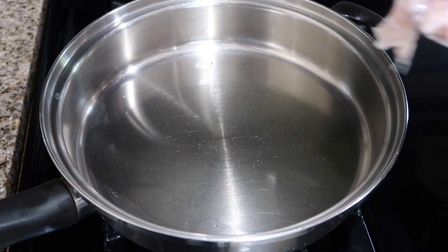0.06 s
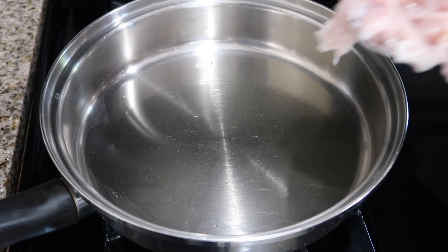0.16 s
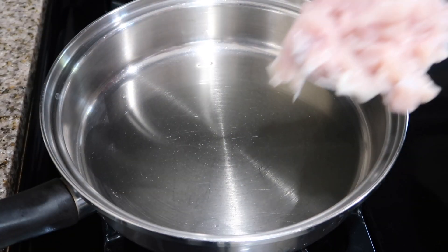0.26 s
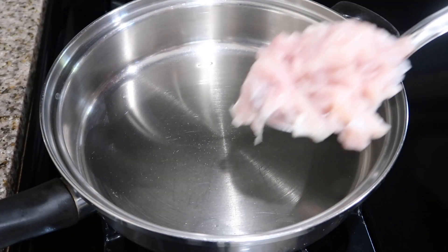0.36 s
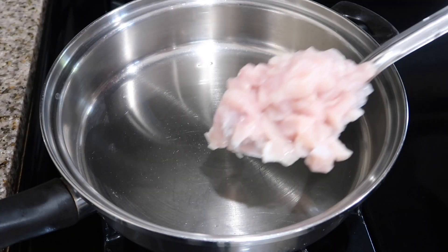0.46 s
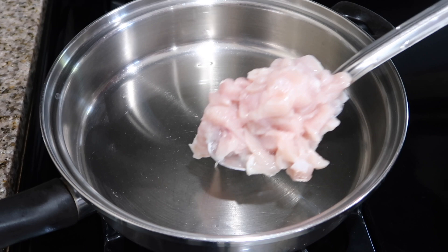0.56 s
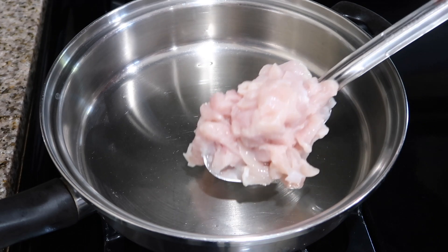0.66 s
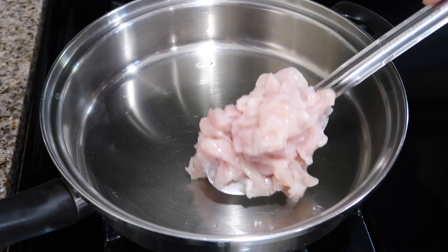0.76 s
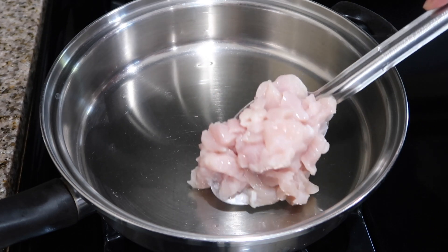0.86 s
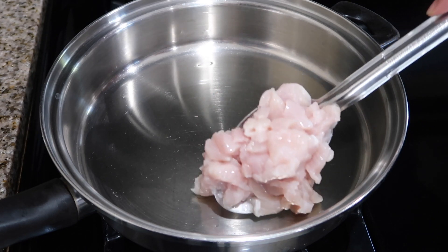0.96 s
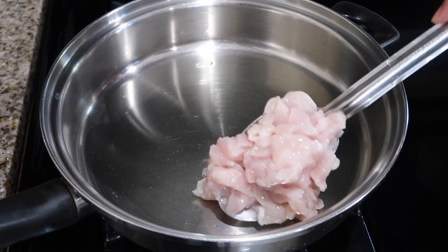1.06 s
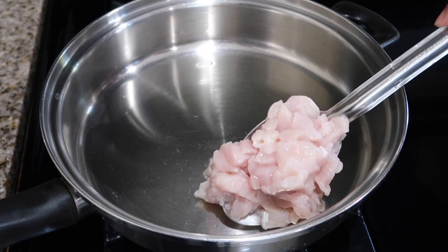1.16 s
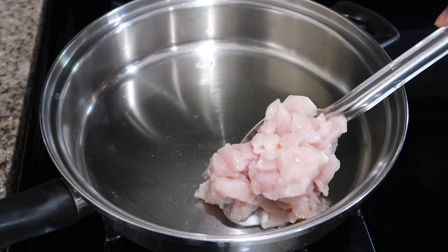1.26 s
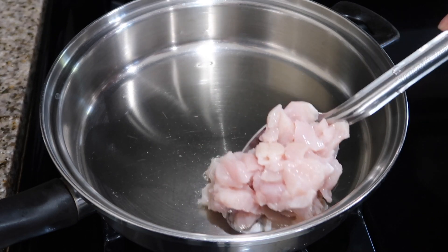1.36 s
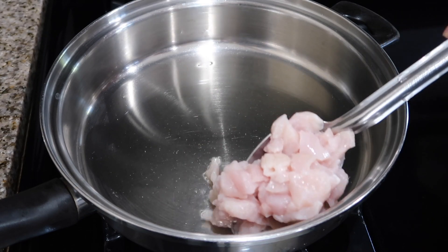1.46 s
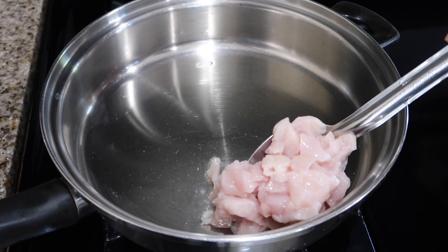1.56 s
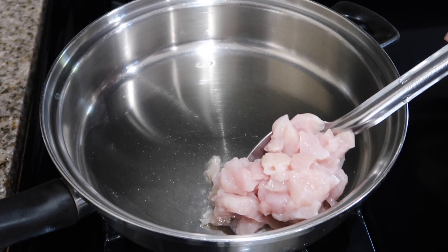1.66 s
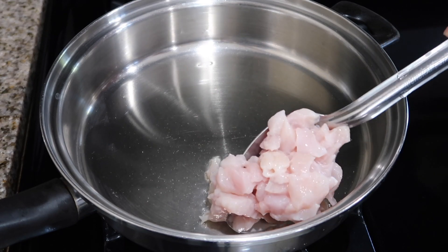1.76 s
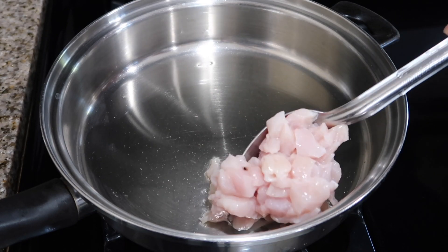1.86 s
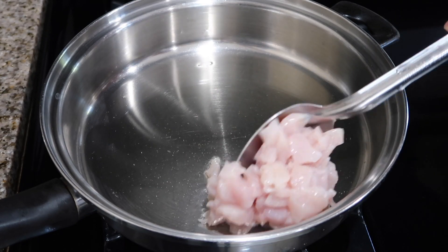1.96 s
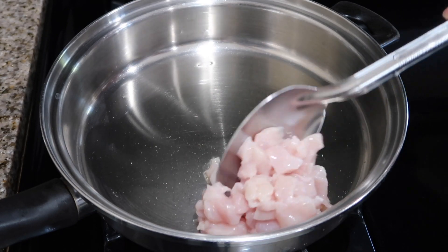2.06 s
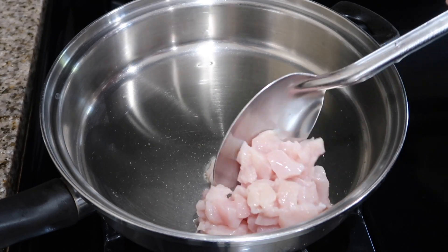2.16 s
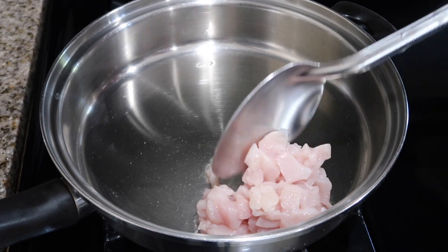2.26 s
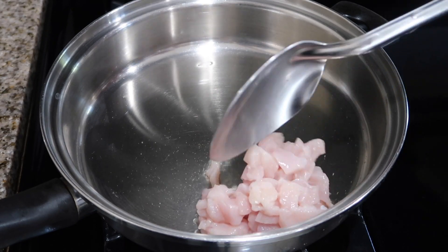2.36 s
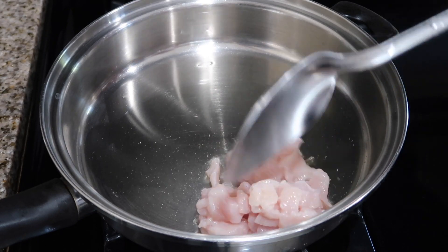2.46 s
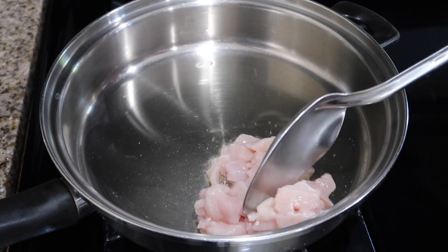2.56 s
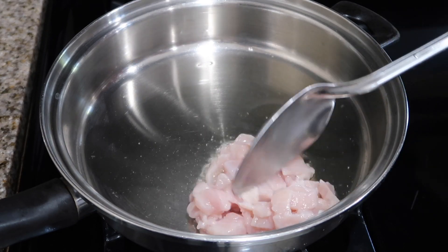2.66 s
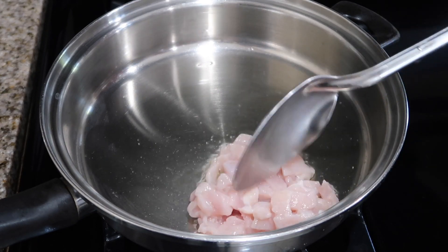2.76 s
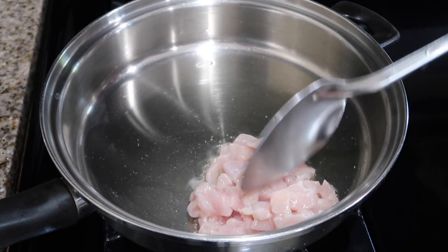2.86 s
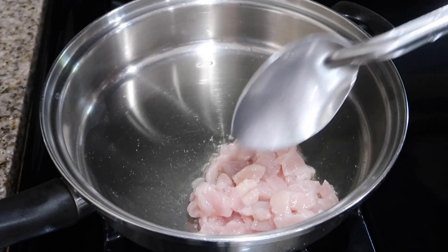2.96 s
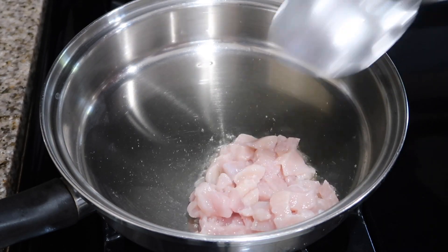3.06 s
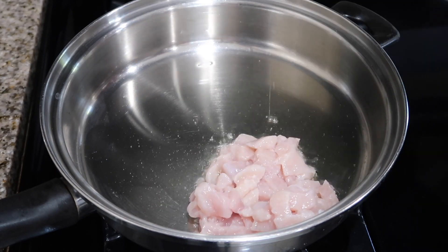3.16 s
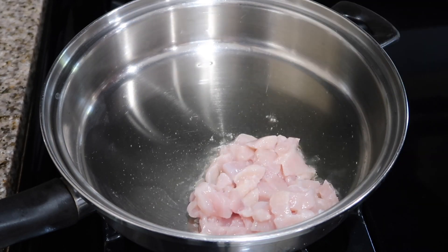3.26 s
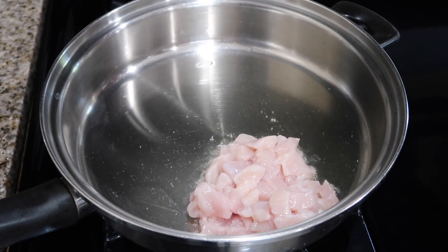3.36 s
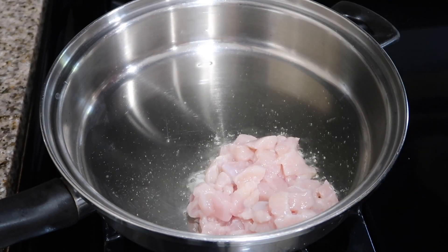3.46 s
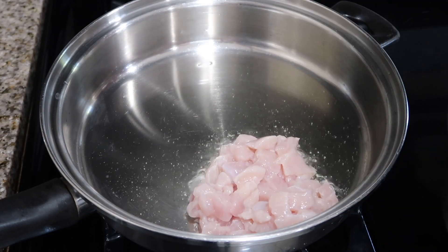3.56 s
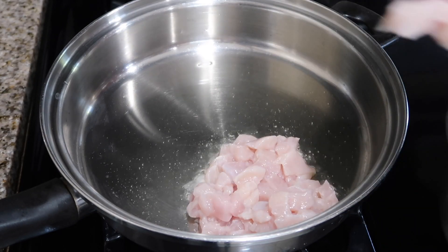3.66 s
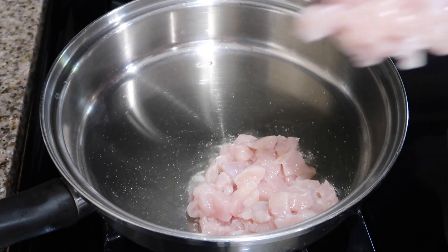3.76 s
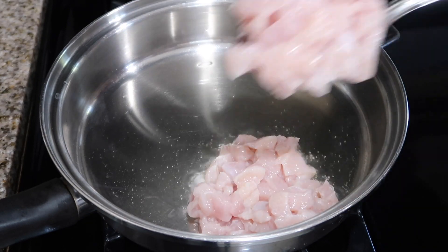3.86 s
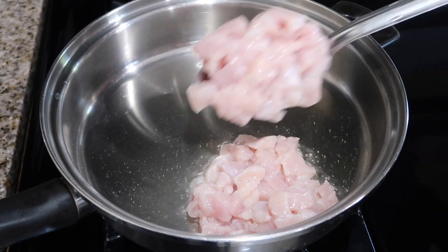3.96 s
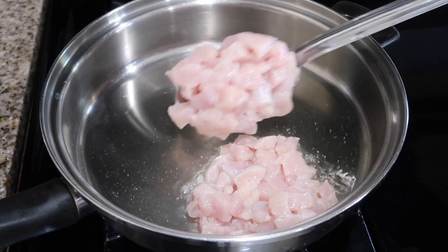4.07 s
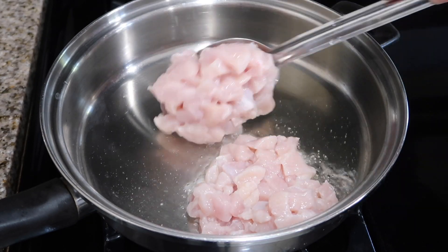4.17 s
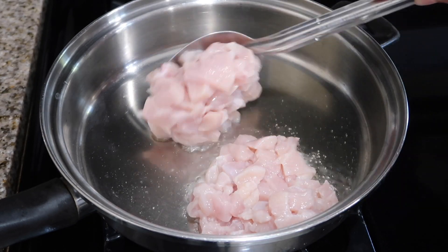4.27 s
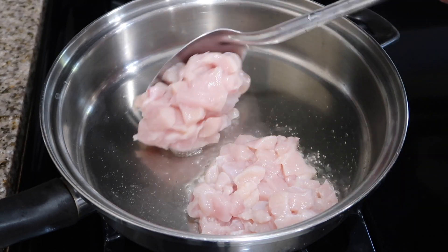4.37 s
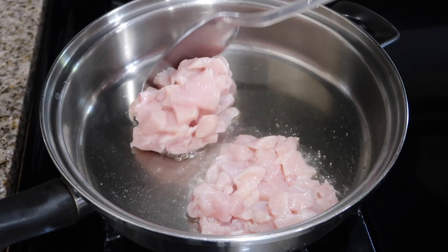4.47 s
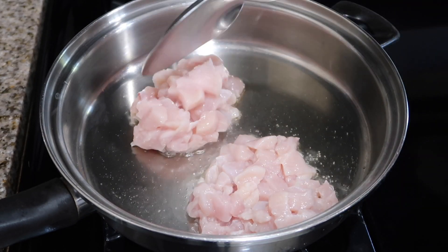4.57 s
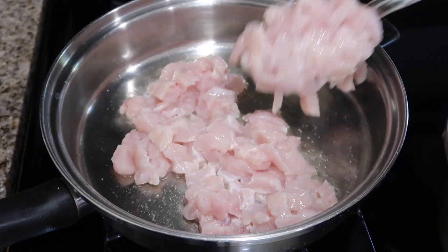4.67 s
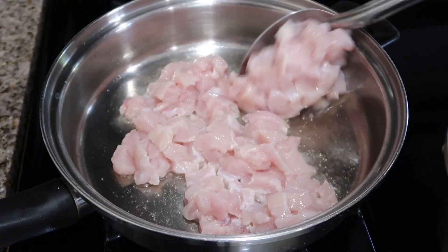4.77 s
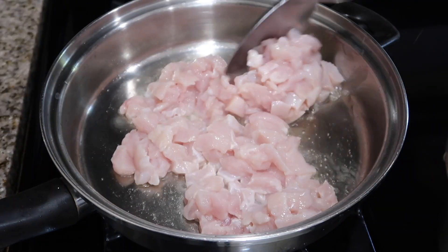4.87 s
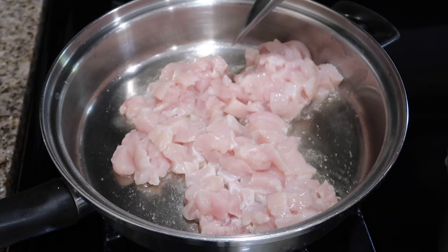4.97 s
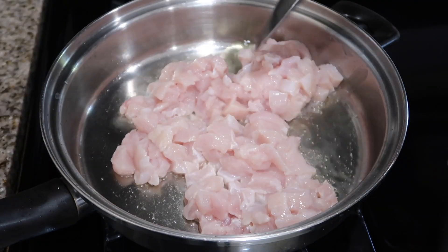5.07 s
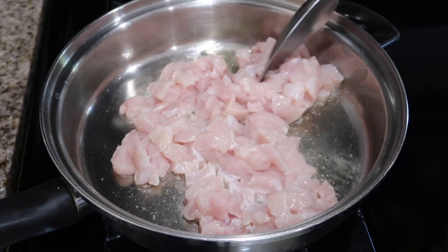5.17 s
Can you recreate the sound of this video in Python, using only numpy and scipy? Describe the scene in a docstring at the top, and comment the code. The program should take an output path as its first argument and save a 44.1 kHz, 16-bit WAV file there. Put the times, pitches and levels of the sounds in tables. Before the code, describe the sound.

After a quiet kitchen hum, wet diced chicken touches hot oil in a steel pan and sizzles up to a lively, crackling fry with spoon knocks.

```python
"""A low kitchen hum is there from the start. Then diced raw chicken is spooned into hot oil in a steel pan.
At the first touch the spoon clinks, the steel rings where spoon and meat rub it, and water flashes to steam:
swarms of short, fading tones make big bubbles sputter under the meat and small ones crackle and fizz.
Spoon knocks ring the pan, steam squirts out as filtered noise, drops spit and large bubbles snap.
Later a fuzzy note of steam sings under the spoon, and a low rumble swells with the second spoonful."""
import sys
import numpy as np
from scipy import signal
from scipy.fft import rfft, irfft, next_fast_len
from scipy.io import wavfile
from scipy.ndimage import map_coordinates

SR = 44100
rng = np.random.default_rng(int(sys.argv[2]) if len(sys.argv) > 2 else 0)


def materialize(psi):
    """Save the field psi as 16-bit PCM at rate SR to the path in sys.argv[1].

    A 1-D psi becomes a single channel; in a 2-D psi each row is a channel.
    """
    bounded = np.clip(np.atleast_2d(psi).T, -1, 1)
    quanta = np.round(bounded * 32767).astype(np.int16)
    wavfile.write(sys.argv[1], SR, quanta)


N = 229620

# Tone colour of the kitchen background: (frequency [Hz], relative level [dB])
KITCHEN_COLOUR = [(15, -25), (28, -11), (45, -8), (100, -5.5), (150, -10.5), (300, -10), (400, -17),
                  (720, -17), (1000, -25), (2000, -33), (2800, -32.5), (6000, -42.5), (15000, -55.5)]
KITCHEN_DB = -44.5
# Steady tones of an appliance: (frequency [Hz], rms level [dB])
APPLIANCE_HUM = [(59.4, -50), (119, -53.5), (237, -59.5), (473, -57), (2664, -70)]
# How alike left and right are in the room background: (frequency [Hz], likeness [-1 to 1])
ROOM_ALIKE = [(60, 1), (200, 0.96), (500, 0.74), (1000, 0.76), (1700, 0.13), (4000, 0.16), (12000, -0.24)]
# How alike left and right are close to the pan: (frequency [Hz], likeness [-1 to 1])
CLOSE_ALIKE = [(60, 1.0), (99, 1.0), (160, 1), (270, 0.99), (450, 1), (740, 1), (1220, 1), (2010, 1),
               (3330, 0.95), (5500, 0.52), (9080, 0.1), (15000, -0.41)]

# Ringing modes of the pan with the spoon in it:
# (frequency [Hz], width [Hz], level over a bubble's direct sound [dB], weight when rubbed or knocked [dB])
PAN_MODES = [(338, 14, 9.5, -26), (473, 16, 4, -24), (638, 40, 0, -9), (757, 24, 3.5, -3), (852, 28, 6, -1),
             (1195, 45, 1, -9), (1365, 60, 1, -12), (1470, 50, -4, -12), (1828, 40, -6, 0),
             (2140, 60, 0, -17), (3030, 60, -6, -3), (3320, 170, -3, -12), (3610, 55, -9, -10),
             (3890, 100, -5, -8), (4280, 55, -8, -6), (4520, 70, -7, -8), (5030, 110, -10, -8),
             (5600, 120, -3, -7), (6450, 200, -14, -13), (7200, 180, -14, -11)]
DETUNE = 0.0048  # typical random retuning of a mode by the shifting meat, as a share of its pitch

# Spoon or meat sliding on the steel; soft meat rings it low, the spoon's edge high:
# (time [s], length before the fall [s], level [dB], pitch [Hz], spread [octaves])
RUBS = [(0.802, 0.33, -45.5, 834, 0.13), (0.79, 0.052, -41.5, 796, 0.25), (0.793, 0.1, -42, 1900, 0.25),
        (0.93, 0.04, -36, 1830, 0.18), (0.92, 0.53, -36, 3700, 0.83), (1.005, 0.25, -50, 1830, 0.2),
        (1.25, 0.75, -35, 2080, 0.5), (1.565, 0.16, -33.5, 5540, 0.12), (1.583, 0.23, -34, 3800, 0.25),
        (2.064, 0.069, -22.5, 1830, 0.24), (2.15, 0.41, -32, 1830, 0.2), (2.535, 0.081, -26.5, 1840, 0.2),
        (2.518, 0.6, -33, 760, 0.4), (2.677, 0.63, -29.5, 1860, 0.48), (3.406, 0.054, -27, 1700, 0.81),
        (4.29, 0.32, -29.5, 2800, 0.83), (4.347, 0.26, -29, 905, 0.69), (4.485, 0.12, -35, 1850, 0.28),
        (4.853, 0.028, -24, 5450, 0.44), (4.92, 0.05, -30, 3400, 0.25), (5.035, 0.064, -33, 3400, 0.27)]
RUB_ATTACK_S, RUB_FALL_DB_PER_S = 0.012, 510
SLIPS_PER_S = 1800  # a slide is a train of tiny slips
BUNCH_DB, BUNCH_RATE = 2.5, 45  # depth of the slips' bunching, and random points a second
# The meat shuddering on the pan: level at full boil, dB per dB of boil, pitch, spread
SHUDDER_DB, SHUDDER_GROWS, SHUDDER_HZ, SHUDDER_OCTAVES = -41, 0.97, 1090, 0.68

TOUCH_S = 0.7995  # spoon and meat meet the oil
LIFTED_DB, SETTLED_S = -3.5, 1.1  # the first touch is thin, until the meat has settled on the steel

# How hard the oil boils: (time [s], boil [dB], level of the finest spray [dB])
BOIL = [(0.83, -32, -32), (0.88, -35, -43), (1.0, -32, -38), (1.21, -32.5, -34), (1.38, -28.5, -32.5),
        (1.6, -26, -32), (1.8, -24.5, -30.5), (2.05, -23, -28.5), (2.22, -20.5, -29.5), (2.34, -20, -27),
        (2.42, -22, -30), (2.62, -22, -30.5), (3.15, -19.5, -27.5), (3.3, -21, -28.0), (3.7, -21.5, -28),
        (4.2, -22, -29), (4.62, -22, -28), (4.658, -25, -29.5), (4.95, -22.5, -29.5)]
FULL_BOIL_DB = -21  # the boil once the heap lies in the oil
# Tone colour of the frying: (frequency [Hz], relative level [dB])
FRYING_COLOUR = [(150, -8), (250, -20.5), (330, -11.5), (392, -22), (614, -6.5), (837, -13.5), (913, -10.5),
                 (1200, -2), (1670, -5.5), (1850, -2.5), (2020, -3.5), (3110, 2.5), (12200, -8),
                 (14200, -12), (15500, -34)]
# Wet meat slumps onto fresh oil and the boiling surges:
# (time [s], hold [s], fall [dB per s], big bubbles [dB], small bubbles [dB])
SURGES = [(1.245, 0.11, 29, -42, -42), (1.864, 0.22, 56, -51.5, -31), (2.054, 0.079, 200, -46, -28.5),
          (2.227, 0.11, 145, -36, -25), (2.517, 0.14, 4, -32.5, -28), (4.282, 0.37, 689, -36, -39),
          (4.827, 0.05, 142, -31.5, -38), (5.018, 0.2, 10, -32.5, -37.5)]
SURGE_ATTACK_S = 0.024
SPRAY_RISE_S = 0.042  # the finest spray builds up after the touch
FLURRY_DB, FLURRY_RATE = 0.83, 32  # bubbles come in flurries: basic depth, and random points a second
# Each size of bubble: level at full boil, then dB per dB of boil
SPUTTER_DB, CRACKLE_DB, FIZZ_DB = -34, -26, -22.5
SPUTTER_GROWS, CRACKLE_GROWS, FIZZ_GROWS = 0.99, 1.02, 1.135
STRAY_DB, STRAY_GROWS = -40, 0.76  # sparse sharp pops of oil
# Juice runs off the spoon and spatters in bright clumps: (time [s], length before the fall [s], level [dB])
SPATTER_CLUMPS = [(1.513, 0.052, -31), (1.563, 0.064, -28), (1.67, 0.046, -30), (3.386, 0.12, -28.5)]
SPATTER_DB = -34.5  # between the clumps, at full boil
SPATTER_ATTACK_S, SPATTER_FALL_DB_PER_S = 0.01, 600

# The spoon knocks against the steel: (time [s], level [dB], pitch [Hz])
KNOCKS = [(0.947, -23, 2900), (1.15, -23, 3080), (2.069, -13, 1850), (2.073, -9, 3100), (2.102, -17, 1840),
          (2.118, -12, 1850), (2.544, -10.5, 1850), (2.602, -14, 1850), (3.237, -14, 1880),
          (4.498, -18, 1900), (4.859, -12.5, 5600), (4.938, -16, 3280)]
KNOCK_OCTAVES = 0.36  # how far around its own pitch a knock rings the steel
# Steam squirting from under the meat:
# (time of the middle [s], level [dB], pitch [Hz], basic width [Hz], spread in time [s])
JETS = [(1.04, -29, 5130, 250, 0.0062), (1.793, -28.5, 7540, 1200, 0.007), (2.355, -24, 3270, 900, 0.016),
        (3.202, -24, 3620, 1100, 0.013), (4.865, -20, 4370, 1500, 0.015)]
# Single drops that burst: (time [s], level before the trim [dB], pitch [Hz])
SPITS = [(1.237, -14, 1900), (1.277, -16, 1700), (1.29, -14.5, 1450), (1.342, -17, 1810),
         (1.364, -12.5, 3100), (1.39, -17.5, 1300), (1.425, -17.5, 4970), (1.439, -13, 2000),
         (1.484, -19, 1400), (1.586, -15, 1010), (1.716, -13, 2200), (2.368, -12, 2600), (2.551, -11, 1850),
         (3.236, -15, 1830), (4.504, -12, 3300), (4.981, -14, 1180)]
SPIT_TRIM_DB = -7.5
SPIT_CRACK_T60_S, SPIT_SPRAY_T60_S = 0.0064, 0.058  # time to fade by 60 dB
# Large single bubbles that snap: (time [s], peak level [dB], pitch [Hz])
POPS = [(1.2928, -14, 1400), (1.3448, -15, 1800), (1.3647, -14, 2100), (1.4417, -9, 4500),
        (2.1344, -2.5, 1590), (2.3708, -7, 2650), (2.5534, -9, 1990), (3.0415, -5, 4100),
        (3.2378, -1, 2200), (3.443, -3, 1700), (3.5445, -8, 2000), (4.0293, -7, 1500), (4.509, -7, 3600),
        (4.864, -8, 4000)]
POP_CYCLES = 4.6  # cycles to fade by 60 dB
# Steam in the hollow under the tilted spoon: (time [s], pitch [Hz], level [dB])
HOLLOW = [(1.84, 2250, -55), (1.89, 2246, -33), (2.05, 2290, -32.5), (2.189, 2323, -26), (2.3, 2374, -29),
          (2.37, 2450, -22), (2.41, 2385, -29), (2.48, 2320, -32), (2.54, 2290, -65)]
# Fading of the kitchen's echo: (frequency [Hz], time to fade by 60 dB [s])
WALL_FADE = [(300, 0.42), (3000, 0.12), (12000, 0.07)]
ECHO_DB = -10.0
TOP_HZ = 15138  # highest frequency kept


def amp(db):
    """Turn decibels into a gain."""
    return 10 ** (np.asarray(db) / 20)


def unit(x):
    """Scale so that the mean of the channels has rms 1."""
    return x / np.sqrt(np.mean(np.atleast_2d(x).mean(0) ** 2) + 1e-20)


def along(points, hz):
    """Read a (frequency, value) table on a logarithmic frequency axis."""
    f, v = np.transpose(points)
    return np.interp(np.log(hz + 1), np.log(f + 1), v)


def filtered(x, response):
    """Filter x by a gain or complex response given as a function of frequency."""
    m = next_fast_len(N + SR // 2, real=True)
    return irfft(rfft(x, m) * response(np.fft.rfftfreq(m, 1 / SR)), m)[..., :N]


def causal(gain):
    """Minimum-phase response with this gain: it starts promptly and never rings ahead of its cause."""
    cepstrum = irfft(np.log(np.maximum(gain, 1e-6)))
    half = len(cepstrum) // 2
    # fold the half before time zero onto the half after it
    cepstrum[1:half] *= 2
    cepstrum[half + 1:] = 0
    return np.exp(rfft(cepstrum))


def resonance(hz, centre, width):
    """One damped mode, with gain 1 at its centre."""
    return 1j * hz * width / (centre ** 2 - hz ** 2 + 1j * hz * width)


def band(hz, low, high, order=6):
    """Gain of a band-pass; a higher order makes it steeper."""
    low_cut = 1 + (low / (hz + 1)) ** (2 * order)
    high_cut = 1 + (hz / high) ** (2 * order)
    return 1 / np.sqrt(low_cut * high_cut)


def stereo(pair, alike=CLOSE_ALIKE):
    """Mix two signals to left and right, as alike at each frequency as the table says."""
    def mid_and_side_gain(hz):
        likeness = np.clip(along(alike, hz), -.9, .994)
        return np.array([np.ones_like(hz), np.tan(np.arccos(likeness) / 2)])
    mid, side = filtered(pair, mid_and_side_gain)
    return np.array([mid + side, mid - side])


def wobble(rate):
    """A smooth random curve through this many random points a second."""
    knots = rng.standard_normal(int(N * rate / SR) + 4)
    return map_coordinates(knots, [np.arange(N) * rate / SR])


def swell(start, attack, hold, fall):
    """Gain that rises, then falls in dB per second once the hold, counted from the start, is over."""
    age = np.arange(N) / SR - start
    return np.clip(age / attack, 0, 1) * amp(-fall * np.maximum(age - hold, 0))


def boil(grows):
    """The boil in dB against a full boil, for a layer that grows so many dB per dB."""
    s, db, _ = np.transpose(BOIL)
    return grows * (np.interp(np.arange(N) / SR, s, db) - FULL_BOIL_DB)


def lifted():
    """Loss in dB of crackle and shudder while the spoon still holds the meat off the steel."""
    return np.interp(np.arange(N) / SR, [TOUCH_S, SETTLED_S], [LIFTED_DB, 0])


def kitchen():
    """Diffuse room rumble from filtered noise, with an appliance's hum and faint whine as steady sines."""
    now = np.arange(N) / SR
    noise = filtered(rng.standard_normal((2, N)), lambda hz: amp(along(KITCHEN_COLOUR, hz)))
    air = unit(stereo(noise, ROOM_ALIKE))
    hum = sum(np.sqrt(2) * amp(db) * np.sin(2 * np.pi * (hz * now + rng.random()))
              for hz, db in APPLIANCE_HUM)
    return amp(KITCHEN_DB) * air + hum


def steel(pitch_hz, octaves):
    """The pan's ring after a contact: modes near the contact's pitch ring most, slightly retuned each time."""
    hz, width, _, db = np.transpose(PAN_MODES)[:, :, None]
    t = np.arange(SR // 8) / SR
    nearness = np.exp(-.5 * (np.log2(hz / pitch_hz) / octaves) ** 2)
    size = amp(db) * np.sqrt(width) * nearness
    tuned = hz * (1 + DETUNE * rng.standard_normal(hz.shape))
    modes = size * np.exp(-np.pi * width * t) * np.cos(2 * np.pi * tuned * t)
    signs = rng.choice([-1, 1], (2, len(PAN_MODES)))  # random polarity on each side
    return signs @ modes


def slide(level, pitch_hz, octaves):
    """Tiny slips, in uneven bunches, keep the steel ringing."""
    slips = rng.standard_normal((2, N)) * (rng.random(N) < SLIPS_PER_S / SR)
    slips = slips * amp(BUNCH_DB * np.tanh(wobble(BUNCH_RATE)))
    ring = signal.oaconvolve(level * slips, steel(pitch_hz, octaves), axes=1)[:, :N]
    return ring / ring[0].std() * np.sqrt(np.mean(level ** 2))


def rubbing():
    """Boiling meat shudders on the pan from the touch on; each slide of spoon or meat rings it too."""
    touching = np.arange(N) / SR > TOUCH_S
    shudder_level = amp(SHUDDER_DB + boil(SHUDDER_GROWS) + lifted()) * touching
    total = slide(shudder_level, SHUDDER_HZ, SHUDDER_OCTAVES)
    for s, length, db, hz, octaves in RUBS:
        level = amp(db) * swell(s, RUB_ATTACK_S, length, RUB_FALL_DB_PER_S)
        total = total + slide(level, hz, octaves)
    return stereo(total)


def clink(ring_db=-20, pitch_hz=2300, t60=0.019):
    """The loaded spoon touches down with one short, damped ring."""
    age = np.maximum(np.arange(N) / SR - TOUCH_S, 0)
    return amp(ring_db - 60 * age / t60) * np.sin(2 * np.pi * pitch_hz * age)


def pan(hz):
    """Gain of the pan: the direct sound plus its ringing modes."""
    return np.sqrt(1 + sum(np.abs(amp(db) * resonance(hz, f, w)) ** 2 for f, w, db, _ in PAN_MODES))


def bubbles(level, low_hz, high_hz, rate, cycles, scatter_db):
    """A swarm of bursting bubbles, each a few damped cycles; harder boiling makes more of them."""
    now = np.arange(N) / SR
    when, place, luck, side, strength, flip = rng.random((int(rate * N / SR), 6)).T
    start = (when * N).astype(int)
    hz = low_hz + place * (high_hz - low_hz)
    # share of the possible bubbles that burst
    busy = np.clip(level / np.median(level), .15, 1)
    # flurries stand out more when bubbles are few
    flare = amp(FLURRY_DB * wobble(FLURRY_RATE) / np.sqrt(busy))
    # many weak bubbles, a few strong ones, of random polarity
    size = flare[start] * amp(scatter_db * np.minimum(-np.log(1 - strength), 5))
    size = size * np.sign(flip - .5) * (luck < busy[start])
    age = np.arange(int(min(cycles * SR / low_hz, 400)))  # in samples
    phase = hz[:, None] * age / SR  # in cycles
    grains = (size * np.sqrt(hz))[:, None] * np.cos(2 * np.pi * phase) * amp(-60 * phase / cycles)
    # each bubble comes from its own direction
    direction = np.sqrt(3) * (2 * side[:, None] - 1)
    spots = (start[:, None] + age).ravel()
    pair = np.array([np.bincount(spots, g.ravel(), N)[:N] for g in (grains, grains * direction)])
    # even out the loudness, so that level alone sets it
    even = pair / np.sqrt(busy)
    colour = lambda f: causal(amp(along(FRYING_COLOUR, f)) * band(f, low_hz, high_hz) * pan(f))
    return unit(stereo(filtered(even, colour))) * level * (now > TOUCH_S)


def sizzle(seethe_db=0.26, seethe_rate=14):
    """Four sizes of bubble seethe together; surges add larger ones, spatter and stray pops stand out."""
    big, small = 0, 0
    for s, hold, fall, big_db, small_db in SURGES:
        surge = swell(s, SURGE_ATTACK_S, hold, fall)
        big = big + amp(big_db) * surge
        small = small + amp(small_db) * surge
    # slow pockets under the meat
    sputter_level = np.hypot(amp(SPUTTER_DB + boil(SPUTTER_GROWS)), big)
    sputter = bubbles(sputter_level, low_hz=286, high_hz=1155, rate=2000, cycles=1.9, scatter_db=3.0)
    # smaller bubbles at its edges
    crackle_level = np.hypot(amp(CRACKLE_DB + boil(CRACKLE_GROWS) + lifted()), small)
    crackle = bubbles(crackle_level, low_hz=1213, high_hz=2606, rate=3800, cycles=6.3, scatter_db=2.5)
    fizz_level = amp(FIZZ_DB + boil(FIZZ_GROWS))
    fizz = bubbles(fizz_level, low_hz=2400, high_hz=7280, rate=8500, cycles=6.6, scatter_db=1.0)
    # the finest spray
    s, _, spray_db = np.transpose(BOIL)
    mist_level = amp(np.interp(np.arange(N) / SR, s, spray_db)) * swell(TOUCH_S, SPRAY_RISE_S, 0, 0)
    mist = bubbles(mist_level, low_hz=6650, high_hz=17000, rate=14000, cycles=1.8, scatter_db=0.0)
    clumps = sum(amp(db) * swell(s, SPATTER_ATTACK_S, length, SPATTER_FALL_DB_PER_S)
                 for s, length, db in SPATTER_CLUMPS)
    spatter_level = np.hypot(amp(SPATTER_DB + boil(FIZZ_GROWS)), clumps)
    spatter = bubbles(spatter_level, low_hz=2800, high_hz=6600, rate=1800, cycles=7.3, scatter_db=1.5)
    stray_level = amp(STRAY_DB + boil(STRAY_GROWS))
    strays = bubbles(stray_level, low_hz=795, high_hz=8000, rate=45, cycles=1.9, scatter_db=2.5)
    seethe = amp(seethe_db * wobble(seethe_rate))
    return seethe * (sputter + crackle + fizz + mist) + spatter + strays


def knocks():
    """The spoon's edge catches on the steel: an abrupt ring that oil and meat soon damp."""
    out = np.zeros((2, N + SR))
    for s, db, hz in KNOCKS:
        ring = steel(hz, KNOCK_OCTAVES)
        out[:, round(s * SR):][:, :ring.shape[1]] += amp(db) * ring / np.abs(ring[0]).max()
    return stereo(out[:, :N])


def jets():
    """Trapped steam escapes through a narrow gap in a short, pitched hiss."""
    now, out = np.arange(N) / SR, np.zeros((2, N))
    for s, db, hz, width, spread in JETS:
        # two wide resonances in a row
        hiss = filtered(rng.standard_normal((2, N)), lambda f: resonance(f, hz, 2.5 * width) ** 2)
        out += amp(db) * unit(hiss) * np.exp(-.5 * ((now - s) / spread) ** 2)
    return stereo(out)


def spits():
    """A drop bursts with a crack and a brief spray of noise, both coloured by the pan's ringing."""
    out, t = np.zeros((2, N)), np.arange(SR // 5) / SR
    f = np.fft.rfftfreq(len(t), 1 / SR)
    shape = 0.25 * amp(-60 * t / SPIT_CRACK_T60_S) + amp(-60 * t / SPIT_SPRAY_T60_S)
    for s, db, hz in SPITS:
        colour = causal(np.abs(resonance(f, hz, 1.4 * hz)) ** 2 * pan(f))
        colour /= np.sqrt(np.mean(np.abs(colour) ** 2))
        noise = shape * rng.standard_normal((2, len(t)))
        burst = irfft(rfft(noise) * colour, len(t))[:, :N - round(s * SR)]
        out[:, round(s * SR):][:, :len(t)] += amp(db + SPIT_TRIM_DB) * burst
    return stereo(out)


def pops():
    """A large bubble snaps close to the microphone: a few sharply damped cycles."""
    out, t = np.zeros(N), np.arange(SR // 50) / SR
    for s, db, hz in POPS:
        snap = amp(db - 60 * hz * t / POP_CYCLES) * np.cos(2 * np.pi * hz * t)
        out[round(s * SR):][:len(t)] += snap
    return out


def hollow(width_hz=95):
    """Steam sings in a hollow: a fuzzy note climbs as the gap closes, then sinks and dies as it opens."""
    now = np.arange(N) / SR
    s, hz, db = np.transpose(HOLLOW)
    # slow noise on a sine and a cosine blurs the note
    flutter = filtered(rng.standard_normal((2, 2, N)), lambda f: 1 / (1 + (f / width_hz) ** 3))
    phase = 2 * np.pi * np.cumsum(np.interp(now, s, hz)) / SR
    note = flutter[0] * np.cos(phase) + flutter[1] * np.sin(phase)
    singing = (now > s[0]) * (now < s[-1])
    return amp(np.interp(now, s, db)) * singing * note / note[0].std()


def rumble(start=3.5, hold=0.91, fall=18, level_db=-47):
    """A soft low rumble of filtered noise swells while the second spoonful comes in."""
    low = filtered(rng.standard_normal((2, N)), lambda hz: band(hz, 76, 240, order=3))
    return amp(level_db) * swell(start, 0.082, hold, fall) * unit(stereo(low))


def walls(x):
    """The kitchen's short echo changes as the bubbling moves about the pan; the treble dies first."""
    size = SR // 3  # each third of a second has its own random echo
    pieces = np.pad(x.mean(0), (0, -N % size)).reshape(-1, size)
    noise = rng.standard_normal((2, len(pieces), size))
    hz, _, z = signal.stft(noise, SR, nperseg=256)
    t = np.linspace(0, size / SR, z.shape[-1])
    fade = amp(-60 * t / along(WALL_FADE, hz)[:, None])
    tails = signal.istft(z * fade, SR, nperseg=256)[1]
    tails = tails / np.linalg.norm(tails, axis=-1, keepdims=True)
    echoes = signal.fftconvolve(pieces[None], tails, axes=-1)
    out = np.zeros((2, N + 2 * SR))
    for k in range(len(pieces)):
        out[:, k * size:][:, :echoes.shape[-1]] += echoes[:, k]
    return stereo(out[:, :N])


def scene():
    """The frying pan in its kitchen."""
    steam = stereo(hollow()) + jets()
    frying = clink() + sizzle() + rubbing() + knocks() + steam + spits() + pops()
    return frying + amp(ECHO_DB) * walls(frying) + kitchen() + rumble()


def record(dry):
    """Keep nothing above the band limit, with a short slope around it."""
    return filtered(dry, lambda hz: np.clip((TOP_HZ - hz) / 300 + .5, 0, 1))


dry = scene()
out = record(dry)
materialize(out)
```